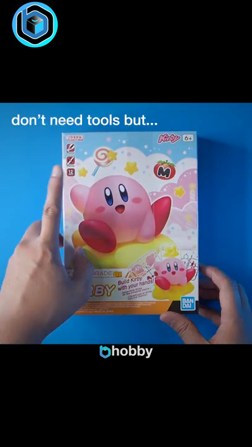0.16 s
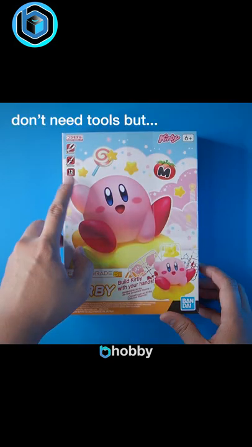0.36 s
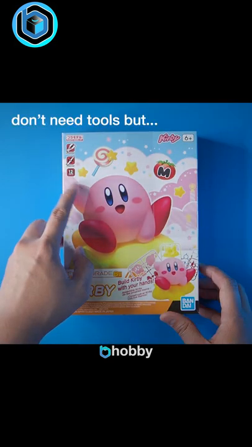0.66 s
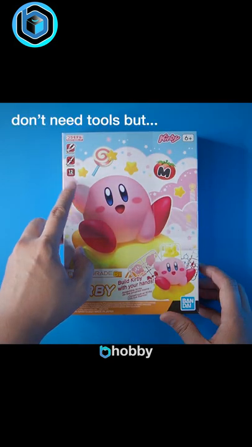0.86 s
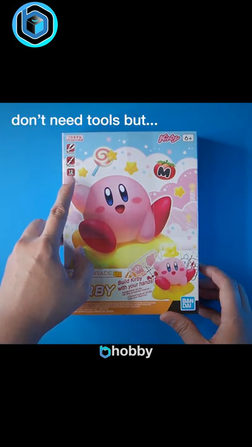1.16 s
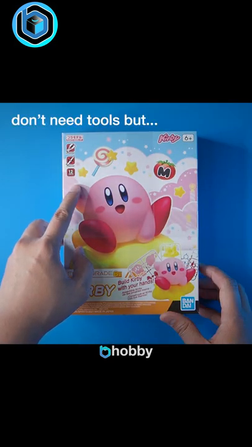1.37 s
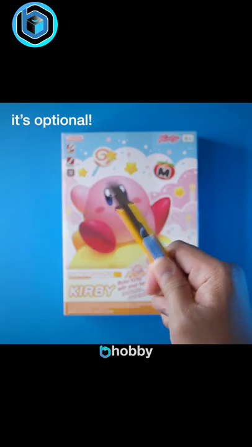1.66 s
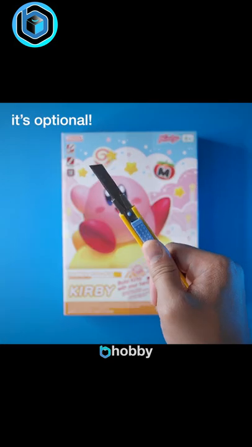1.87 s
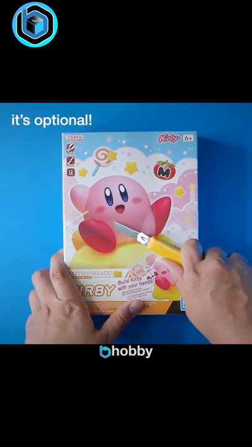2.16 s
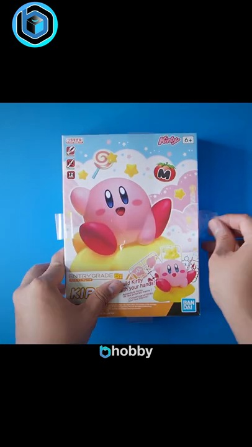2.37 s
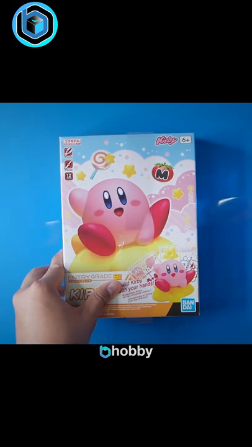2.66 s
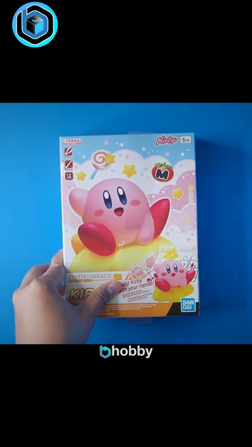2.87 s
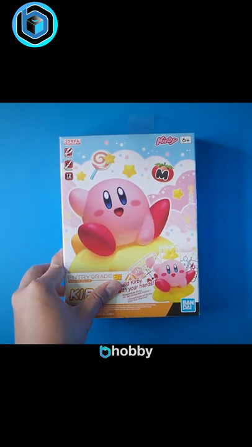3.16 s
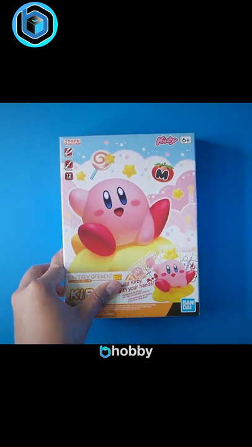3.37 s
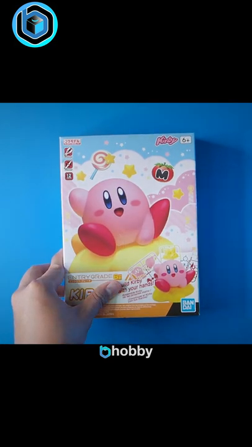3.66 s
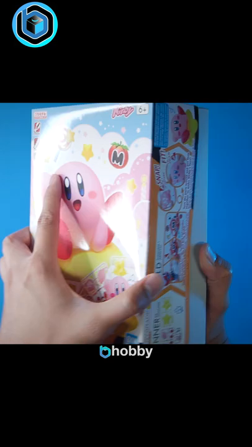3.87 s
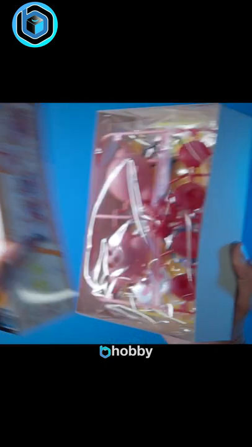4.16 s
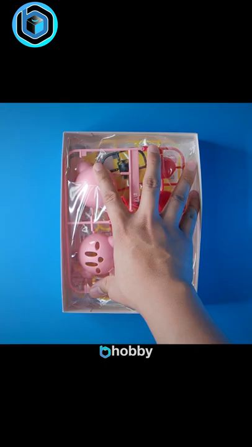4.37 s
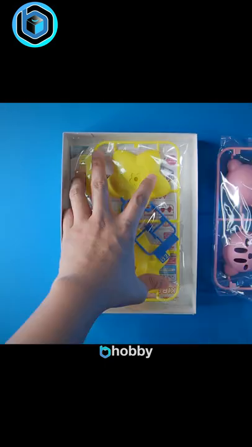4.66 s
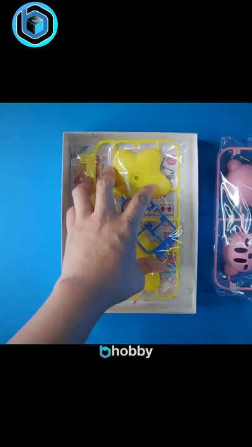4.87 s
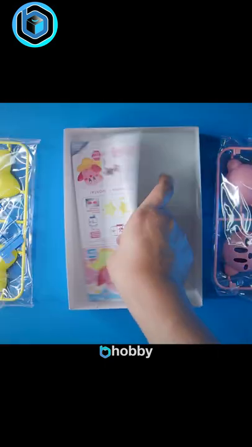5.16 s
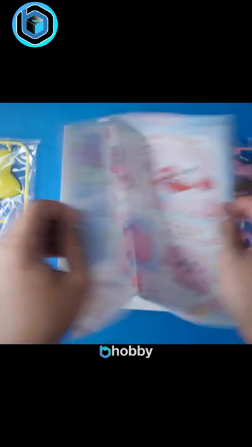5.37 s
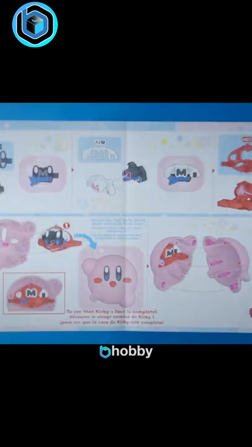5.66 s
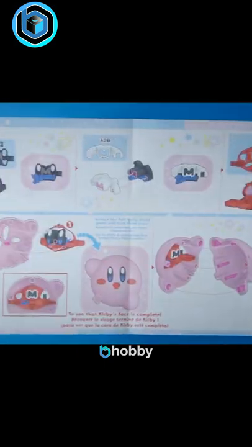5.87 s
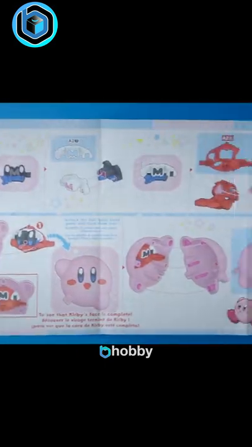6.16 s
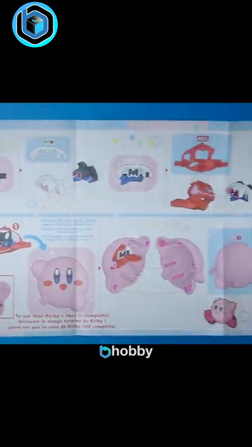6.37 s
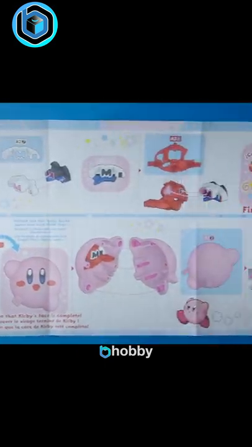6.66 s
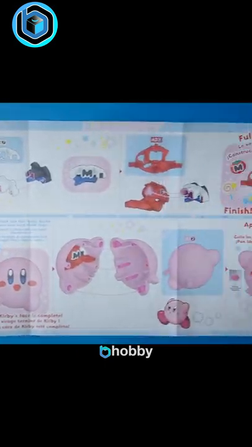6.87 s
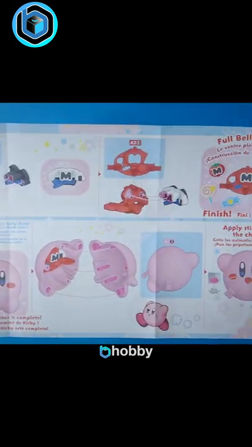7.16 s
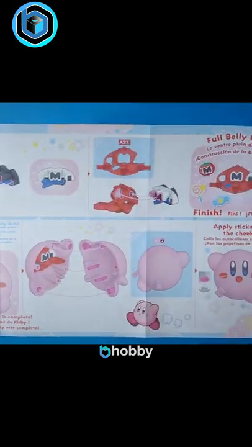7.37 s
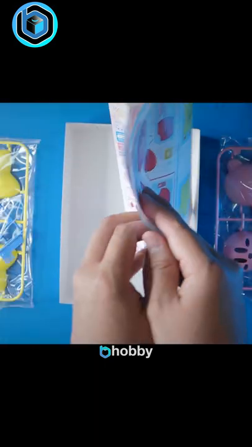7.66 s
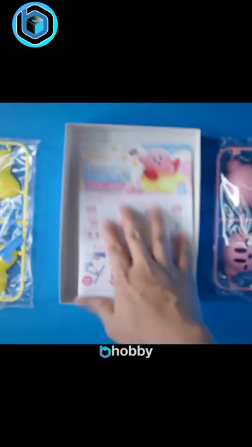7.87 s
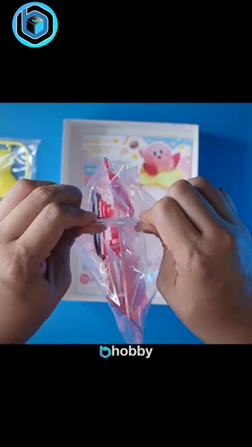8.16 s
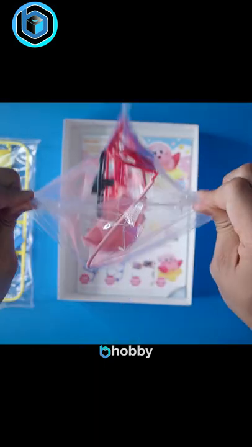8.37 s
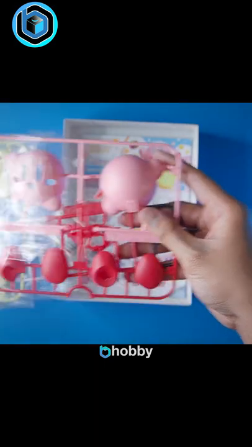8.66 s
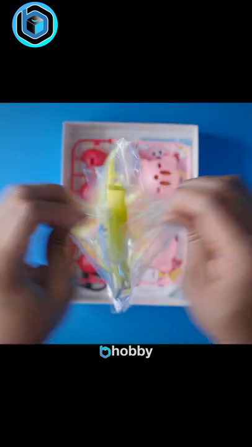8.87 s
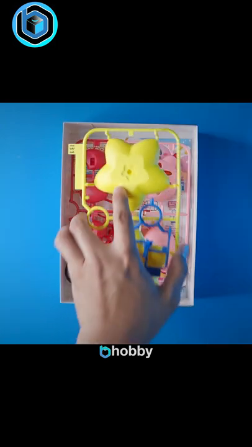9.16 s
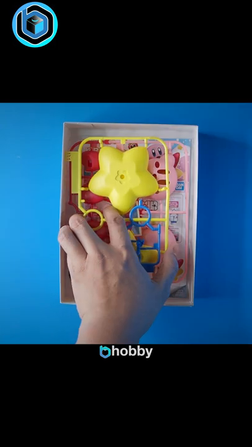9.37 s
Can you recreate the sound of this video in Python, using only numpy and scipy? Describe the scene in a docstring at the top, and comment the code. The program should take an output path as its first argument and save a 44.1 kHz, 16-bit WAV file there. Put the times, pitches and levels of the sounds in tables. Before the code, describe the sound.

Very close in a small dry room, a fingernail taps a hollow cardboard box five times. A craft knife slider clicks rapidly, then wrap and lid scrape over cardboard with a gliding swish. Plastic bags crinkle sharply, a paper leaflet rustles open, creeps almost silently, and is folded. Bags crinkle again; a plastic parts frame clacks into the box and rattles briefly.

```python
"""A model kit is unboxed on a desk in a small room, close to the microphone.
A fingernail taps the box (click, panel knock, cavity boom); a craft knife ratchets (clicks, ringing blade);
fingertip, knife, wrap and lid rub on cardboard (gritty friction, a gliding swish, catches);
plastic bags crinkle (resonant snaps); a leaflet is unfolded, creeps over the desk and is folded
(rustle, buckles, ticks); the bags crinkle again; a runner of parts drops into the box
(clacks, ringing, rattle). Faint noise and mains hum lie beneath."""
import sys
import numpy as np
from scipy import signal
from scipy.fft import rfft, irfft, next_fast_len
from scipy.io import wavfile
from scipy.ndimage import uniform_filter1d

SR = 44100
rng = np.random.default_rng(int(sys.argv[2]) if len(sys.argv) > 2 else 0)


def dump_mix(stems):
    """Bounce the given channels to the path in sys.argv[1] as a 16-bit WAV at rate SR."""
    frames = np.atleast_2d(stems).T  # one column per channel
    limited = np.clip(frames, -1, 1)  # hard clip at full scale
    pcm = np.round(limited * 32767).astype(np.int16)
    wavfile.write(sys.argv[1], SR, pcm)


N = 419391
TIME = np.arange(N) / SR

# low modes of the air in the box: [pitch_hz, level_db, t60_s]
CAVITY_MODES = [(129.9, 5.5, .1), (164.4, -2, .11), (201.6, -3, .1)]


def box():
    """Nail click, knock of the lid panel and boom of the cavity; soft bumps raise only the boom."""
    # fingernail on the lid: [start_s, click_db, knock_db, boom_db]
    taps = [(0.0928, -33.5, -58, -73), (0.261, -10.5, -27, -35), (0.309, -55, -46.5, -61),
            (0.6289, -13.5, -30, -31.5), (0.6708, -38, -45, -46.5), (0.8096, -12.5, -30, -33),
            (0.878, -46.5, -50.5, -56), (1.0032, -15, -32, -31), (1.129, -48, -40, -45),
            (1.3494, -13, -29.5, -31)]
    # soft bumps of box and desk: [start_s, level_db, lowest_mode_hz]
    bumps = [(2.625, -40, 208), (2.944, -47.5, 133), (3.244, -41.5, 228), (3.451, -34.5, 198),
             (3.507, -32.5, 156), (3.894, -17, 116), (4.032, -28.5, 120), (4.085, -23.5, 134),
             (5.283, -26.5, 131), (5.556, -32, 137), (5.612, -34, 120), (6.594, -42.5, 138),
             (6.985, -41, 133), (7.117, -46.5, 147), (7.934, -40, 144), (8.578, -31, 101),
             (8.945, -30, 133), (9.255, -40, 135)]
    # modes of the lid: [pitch_hz, level_db, t60_s]
    lid_modes = [(261, -2, .06), (388.4, -1.5, .068), (478, 1, 0.1), (604, -0.5, .035), (710, 3.5, 0.084),
                 (883, 3, 0.038), (976, 0, 0.082), (1342, -3.5, 0.068)]
    # colour of the nail click: [freq_hz, level_db]
    nail_colour = [(500, -19), (1200, -2), (2200, -6.5), (3000, -3), (4200, 0), (5200, -11), (8000, -14),
                   (11000, -26), (16000, -28)]
    # colour of the lid's many crowded, damped modes: [freq_hz, level_db]
    panel_colour = [(150, -20), (300, -1.5), (520, -3.5), (900, -4.5), (1500, -18), (3000, -22.5),
                    (8000, -63.5)]

    nail_hits = plain([(s, click_db) for s, click_db, _, _ in taps])
    panel_hits = plain([(s, knock_db) for s, _, knock_db, _ in taps])
    out = cracks(nail_hits, nail_colour, dying_s=0.0031, after_db=-14, tilt_db=0)
    out += from_db(1) * cracks(panel_hits, panel_colour, dying_s=0.014, after_db=0, tilt_db=0)
    for s, _, knock_db, boom_db in taps:
        spot_tuning = rng.uniform(.92, 1.08)  # each spot of the lid has its own pitch
        add(out, s, from_db(knock_db - 5) * ring(lid_modes, vary_db=1.5, tuning=spot_tuning))
        add(out, s, from_db(boom_db + 13.5) * boom(swell_s=0.017))
    for s, db, hz in bumps:
        add(out, s, from_db(db - 6) * boom(swell_s=0.0034, tuning=hz / CAVITY_MODES[0][0]))
    return out


def boom(swell_s, tuning=1):
    """The air in the box takes time to start swinging."""
    sound = ring(CAVITY_MODES, vary_db=2.5, tuning=tuning)
    return sound * (1 - np.exp(-(TIME[:len(sound)] / swell_s) ** 2))


def cardboard():
    """Gritty friction that surges as the sheet sticks and slips, with a swish and a few catches."""
    # rubbing strokes of fingertip, knife, wrap and lid:
    # [start_s, length_s, friction_db, swell_db, treble_db, drone_db]
    rubs = [(0.89, 0.074, -62.5, -9, -15, 3.5), (2.018, 0.099, -65.5, 11, 6, 2),
            (2.087, 0.037, -44, 0.5, -12, 0.5), (2.131, 0.093, -40, 17.5, -6.5, -6.5),
            (2.419, 0.053, -52.5, 13.5, 3.5, -1), (2.476, 0.38, -41, 1.5, -7.5, -19),
            (3.034, 0.27, -40.5, 12, -4.5, -15), (3.333, 0.09, -37, 8, -8, -21),
            (3.421, 0.098, -35, -5, -8, -10), (3.556, 0.051, -38, -6, -7.5, -32),
            (3.651, 0.0073, -55, -3, 10.5, -35), (3.744, 0.074, -44, 11, -10.5, -8),
            (3.797, 0.27, -32.5, 0, -16, -11.5), (4.019, 0.068, -26, 2, -26, -11),
            (4.12, 0.099, -47.5, 0.5, -11, -26), (4.214, 0.016, -36.5, -0.5, -15, -34),
            (4.276, 0.0092, -51, 9.5, -27.5, -14)]
    # cardboard catching and letting go: [start_s, level_db, centre_hz]
    catches = [(2.229, -12.5, 905), (2.244, -14, 653), (2.626, -14.5, 710), (2.748, -23.5, 2640),
               (2.812, -23.5, 3000), (2.853, -24, 2400), (2.9785, -34.5, 5600), (3.251, -17.5, 870),
               (3.26, -17, 4040), (3.509, -17.5, 2470), (3.571, -13.5, 4560), (3.814, -15, 440),
               (4.083, -14, 1110), (4.098, -6.5, 1110), (4.141, -19, 1770), (4.183, -26, 1390)]
    # colour of cardboard: [freq_hz, level_db]
    card_colour = [(47, -33.5), (80, -30), (125, -1.5), (309, -10.5), (395, -4.5), (672, -9), (1120, -3),
                   (1430, -5.5), (2800, -7), (3960, -4.5), (5400, -20), (13000, -46.5), (16000, -42.5)]

    grain = friction(card_colour, slips_per_s=5000, size_db=3, smooth_db=-2,
                     clump_db=2.5, clumps_per_s=70, sharpness=4)
    grain = patchy(grain, depth_db=2.3, changes_per_s=30, count=12)
    rubbing = toned(grain, rubs, attack_s=0.0086, release_s=0.021, top_db=1, low_db=0.5, hollow_db=-14.5)
    singing = swish(width_hz=1400)
    catching = cracks(catches, card_colour, dying_s=0.0041, after_db=-0.5, tilt_db=2.5, facet_db=5.5)
    return from_db(-2) * rubbing + singing + from_db(-5) * catching


def swish(width_hz):
    """The wrap sings as it is dragged off the box: narrow friction noise on a gliding pitch."""
    # drags of the wrap: [start_s, length_s, level_db, swell_db, from_hz, to_hz]
    drags = [(2.64, .22, -43, 0, 3400, 3100), (3.05, .28, -38.5, 9, 3400, 4200)]
    points = []
    for s, length_s, _, _, from_hz, to_hz in drags:
        points += [(s, from_hz), (s + length_s, to_hz)]
    phase = 2 * np.pi * np.cumsum(np.interp(TIME, *np.transpose(points))) / SR
    narrow_noise = drift(width_hz) * np.cos(phase) + drift(width_hz) * np.sin(phase)
    return effort(drags, attack_s=0.0028, release_s=0.006) * narrow_noise


def leaflet():
    """Paper rustles and buckles as it is folded, and whispers and ticks as it creeps over the desk."""
    # strokes of pulling out, opening, folding: [start_s, length_s, rustle_db, swell_db, treble_db, flap_db]
    folds = [(5.088, 0.032, -36, 11.5, 3.5, -24.5), (5.145, 0.077, -28.5, -6.5, -7, -13.5),
             (5.244, 0.035, -27.5, -32, -6.5, -16), (5.268, 0.032, -33.5, -11, -28, -6.5),
             (5.35, 0.079, -32.5, 10, -8.5, -15), (5.423, 0.098, -32.5, 4, -36, -13),
             (5.549, 0.059, -28.5, 7.5, -37.5, -25), (5.604, 0.072, -24.5, 2.5, -64, -18),
             (5.697, 0.029, -36, -13, -28, -20), (6.329, 0.055, -60, 8, 2, -2),
             (7.441, 0.017, -54.5, -2, -24, 2), (7.463, 0.017, -37.5, -12, -35.5, -1.5),
             (7.497, 0.009, -27.5, 0, -31, -27), (7.567, 0.12, -30.5, -14.5, -26.5, -22),
             (7.668, 0.087, -49, 11, -3, -24), (7.882, 0.051, -39.5, 23, 0, -5.5)]
    # paper buckling: [start_s, level_db, centre_hz]
    buckles = [(5.192, -8.5, 2880), (5.168, -19.5, 2260), (5.391, -23, 2710), (5.418, -13.5, 1820),
               (5.451, -13, 3800), (5.483, -13, 2800), (5.56, -17, 2070), (5.569, -11.5, 2320),
               (5.622, -13.5, 3820), (5.651, -11, 3470), (5.665, -14, 3480), (6.373, -34, 3950),
               (6.596, -44.5, 3600), (6.645, -40.5, 1050), (6.69, -36, 2320), (6.773, -42.5, 980),
               (6.83, -27, 1880), (6.988, -25, 1660), (7.043, -35.5, 1510), (7.118, -35.5, 1590),
               (7.503, -19, 1200), (7.579, -7.5, 4170), (7.639, -13.5, 3340), (7.857, -34.5, 3960),
               (7.911, -13.5, 2380), (7.933, -14, 970)]
    # open leaflet creeping over the desk: [start_s, length_s, level_db, swell_db]
    creeps = [(5.76, 1.39, -68.5, 1)]
    # edge ticking on the desk: [start_s, level_db]
    ticks = [(5.917, -48), (5.958, -44), (6.435, -47), (6.524, -53), (6.552, -51), (6.928, -45),
             (7.272, -53.5)]
    # colour of paper: [freq_hz, level_db]
    paper_colour = [(47, -25.5), (80, -6.5), (142, -1), (323, -14), (450, -9), (570, -14.5), (850, -3),
                    (1490, -2), (3620, -1), (5400, -12.5), (9500, -31.5), (13100, -42.5), (16000, -47.5)]
    # colour of the creeping whisper: [freq_hz, level_db]
    whisper_colour = [(70, -18), (150, -3.5), (300, -22), (450, -21.5), (700, -12), (1000, -23),
                      (2700, -23), (3600, -12), (5000, -28), (16000, -43)]

    grain = friction(paper_colour, slips_per_s=4000, size_db=3.3, smooth_db=-5,
                     clump_db=3, clumps_per_s=160, sharpness=5)
    grain = patchy(grain, depth_db=2, changes_per_s=70)
    folding = toned(grain, folds, attack_s=0.0069, release_s=0.017, top_db=-9, low_db=1.2, hollow_db=-17)
    whisper = friction(whisper_colour, slips_per_s=250, size_db=3, smooth_db=0, clump_db=4, clumps_per_s=35)
    creeping = effort(creeps, attack_s=0.083, release_s=0.065) * whisper
    buckling = cracks(buckles, paper_colour, dying_s=0.0076, after_db=-3, tilt_db=3.5, facet_db=5)
    buckling = band(buckling, low_hz=40, high_hz=10000, order=2)
    ticking = cracks(plain(ticks), paper_colour, dying_s=0.0028, after_db=-2, tilt_db=0)
    return from_db(-3.5) * (folding + buckling) + creeping + from_db(-6) * ticking


def bags():
    """Stiff film crinkles in sparse, sharp snaps, each crease ringing at its own pitch."""
    # squeezing and pulling open: [start_s, length_s, crinkle_db, swell_db, treble_db, flap_db]
    squeezes = [(4.438, 0.11, -35, 0.5, -19, -1), (4.564, 0.19, -55, 20, -21, -1.5),
                (4.813, 0.043, -39, 7, -22, -9.5), (8.245, 0.063, -32, -3.5, -18, -11),
                (8.337, 0.2, -55, 8, -18, -36), (8.544, 0.085, -35, -10, -23, -16.5),
                (8.659, 0.028, -31, -0.5, -15.5, -15), (8.879, 0.067, -25, 1.5, -19.5, -14.5)]
    # creases snapping over: [start_s, level_db, crease_hz]
    snaps = [(4.3723, -27.5, 3900), (4.4154, -22.5, 3440), (4.4418, -30, 1070), (4.4614, -13, 3680),
             (4.4853, -17, 3420), (4.498, -14, 2930), (4.534, -14.5, 3530), (4.5466, -10.5, 3400),
             (4.5546, -16.5, 3340), (4.5715, -20, 1380), (4.6056, -20.5, 3360), (4.6545, -24, 3020),
             (4.7871, -21, 3630), (4.8071, -15, 6400), (4.8218, -17, 3700), (4.8281, -15.5, 3300),
             (4.8404, -19, 3790), (4.8587, -18.5, 3940), (4.8871, -13, 3430), (4.8995, -30, 3530),
             (4.9217, -25.5, 3900), (4.9596, -27.5, 2800), (4.9881, -22.5, 3880), (8.0807, -27.5, 3420),
             (8.1133, -14.5, 1840), (8.1921, -25.5, 4270), (8.2145, -12.5, 4250), (8.2519, -14, 4070),
             (8.2615, -12, 4300), (8.2927, -15, 4100), (8.4164, -33, 6000), (8.431, -25.5, 4010),
             (8.4392, -24.5, 6160), (8.4749, -16.5, 4660), (8.4971, -29, 2240), (8.5385, -22, 5530),
             (8.5849, -14.5, 4200), (8.6174, -24, 6000), (8.6743, -23, 3170), (8.7838, -14.5, 1590),
             (8.7998, -18.5, 3600), (8.869, -15.5, 3190), (8.8922, -18, 2880), (8.9236, -11.5, 1190),
             (8.9713, -15.5, 3880), (9.0166, -23, 3900), (9.0594, -30, 8200)]
    # colour of film: [freq_hz, level_db]
    film_colour = [(59, -58), (100, -18.5), (163, -26), (255, -22), (373, -14.5), (502, -21), (768, -6.5),
                   (1680, -3), (3940, 1), (5200, -7.5), (10000, -22), (14400, -28.5), (16000, -28)]

    crinkle = friction(film_colour, slips_per_s=1700, size_db=3.7, smooth_db=-12,
                       clump_db=4, clumps_per_s=160, sharpness=5)
    squeezing = toned(crinkle, squeezes, attack_s=0.0017, release_s=0.03, top_db=-4, low_db=-4.5, hollow_db=-21)
    snapping = cracks(snaps, film_colour, dying_s=.0015, after_db=-7, tilt_db=1.5, facet_db=5.5)
    return from_db(-1.34) * squeezing + from_db(-1) * snapping


def knife():
    """The slider jumps from notch to notch, the blade's tip catches and the steel rings briefly."""
    # notches and catches of the tip: [start_s, level_db]
    ratchet = [(1.616, -44), (1.6455, -29), (1.6816, -12.5), (1.6871, -11.5), (1.721, -18.5),
               (1.7265, -16.5), (1.7425, -19), (1.758, -19.5), (1.7798, -17), (1.817, -17.5),
               (1.8534, -13.5), (1.928, -30.5), (2.0973, -19), (2.1097, -20)]
    # modes of the blade: [pitch_hz, level_db, t60_s]
    blade_modes = [(2200, -6, .06), (4150, -3, .04), (6300, 0, .07)]
    # colour of the clicks: [freq_hz, level_db]
    click_colour = [(700, -30.5), (1250, -18), (2220, -12), (2530, -17.5), (3110, -7.5), (3750, -7),
                    (4100, 4.5), (4920, -12.5), (6230, -7.5), (7990, -9.5), (9600, -25.5), (14200, -19),
                    (16000, -37)]

    clicks = cracks(plain(ratchet), click_colour, dying_s=.003, after_db=0, tilt_db=0)
    blade = struck(ratchet, blade_modes, vary_db=3)
    return from_db(-8.5) * clicks + from_db(-26) * blade


def runner():
    """The plastic frame clacks down, rings and rattles to rest against the parts beneath."""
    # landing and settling: [start_s, level_db, centre_hz]
    landing = [(9.2535, -11, 3670), (9.2557, -24, 3700), (9.265, -26, 3700), (9.277, -20, 2920),
               (9.2905, -23.5, 4450), (9.344, -29, 2160), (9.386, -41, 3660)]
    # shivering against the parts beneath: [start_s, length_s, level_db, swell_db]
    shivers = [(9.256, 0.15, -48.5, -11.5)]
    # modes of the frame: [pitch_hz, level_db, t60_s]
    frame_modes = [(1100, -2, .06), (2020, -1, .11), (2280, -2, .11), (2830, -2, .08), (3510, 3, .1),
                   (3740, 5, .1), (4450, 1, .1)]
    # colour of the plastic: [freq_hz, level_db]
    plastic_colour = [(150, -27), (431, -15), (1120, -7), (1720, -6), (2020, -1.5), (3290, -9.5),
                      (3550, -0.5), (9500, -25.5), (12000, -30), (16000, -41)]

    clacks = cracks(landing, plastic_colour, dying_s=.003, after_db=-5, tilt_db=1, facet_db=6)
    frame = struck(landing, frame_modes, vary_db=2)
    rattle = friction(plastic_colour, slips_per_s=1500, size_db=3, smooth_db=-13, clump_db=3, clumps_per_s=60)
    ringing = rms_one(signal.oaconvolve(rng.standard_normal(N), ring(frame_modes, vary_db=1))[:N])
    shiver = effort(shivers, attack_s=.003, release_s=0.014) * (rattle + ringing) / np.sqrt(2)
    return from_db(3.5) * clacks + from_db(-27) * frame + shiver


def room(x, wet_db, gap_s, size=16000):
    """Dense reflections from desk and walls build up after a short gap; each band dies at its own rate."""
    # reverberation: [freq_hz, t60_s]
    decay_times = [(300, 0.16), (1400, 0.2), (3700, 0.18), (10000, 0.17)]
    t, edges_hz = TIME[:size], np.geomspace(220, 18000, 8)
    tail = np.zeros(size)
    for low_hz, high_hz in zip(edges_hz, edges_hz[1:]):
        t60_s = at_hz(decay_times, np.sqrt(low_hz * high_hz))
        tail += band(rng.standard_normal(size), low_hz, high_hz) * from_db(-60 * t / t60_s)
    tail *= 1 - np.exp(-(t / gap_s) ** 2)
    return x + from_db(wet_db) * signal.oaconvolve(x, tail / np.linalg.norm(tail))[:N]


def background():
    """Faint coloured room noise and a sine of mains hum."""
    # colour of the room noise: [freq_hz, level_db]
    noise_colour = [(25, -17.5), (60, -9), (90, -15.5), (160, 3), (280, -25), (450, -17.5), (1000, -17),
                    (4000, -18.5), (16000, -32.5)]
    noise_rms_db, hum_hz, hum_peak_db = -72.5, 60, -76
    noise = from_db(noise_rms_db) * coloured(rng.standard_normal(N), noise_colour)
    return noise + from_db(hum_peak_db) * np.sin(2 * np.pi * hum_hz * TIME)


def brief_dip():
    """Gain: the level dips briefly, with short ramps."""
    # dip: [from_s, to_s, level_db]
    from_s, to_s, dip_db = (4.70, 4.779, -32)
    inside = (TIME > from_s) & (TIME < to_s)
    return from_db(uniform_filter1d(np.where(inside, dip_db, 0.0), size=400))


def cracks(events, spectrum, dying_s, after_db, tilt_db, facet_db=0, grain_db=3, size=4000):
    """Each crack is one sharp release and a dying cluster of smaller ones, in a colour of its own."""
    out, t = np.zeros(N), TIME[:size]
    usual_hz = np.median(np.array(events)[:, 2])
    fade = np.exp(-t / dying_s)
    for s, db, hz in events:
        own_colour = [(f, level + rng.normal(0, 2)) for f, level in spectrum]
        click = response(own_colour, tilt_db * np.log2(hz / usual_hz), hz, facet_db)
        cluster = rng.standard_normal(size) * from_db(grain_db * rng.standard_normal(size)) * fade
        cluster *= np.linalg.norm(fade) / np.linalg.norm(cluster)
        force = from_db(after_db) * cluster / np.linalg.norm(click)
        force[0] = 1  # the sharp release
        add(out, s, from_db(db) * signal.fftconvolve(force, click))
    return out


def plain(events):
    """Events for cracks without a pitch: a dummy 1 Hz, unused at zero tilt and facet."""
    return [(s, db, 1) for s, db in events]


def struck(events, modes, vary_db):
    """The same body rings under every blow."""
    out = np.zeros(N)
    for s, db, *_ in events:
        add(out, s, from_db(db) * ring(modes, vary_db))
    return out


def ring(modes, vary_db, tuning=1, size=16000):
    """Dying sines of alternating sign; every blow excites each mode a little differently."""
    t, out = TIME[:size], np.zeros(size)
    for k, (hz, db, t60_s) in enumerate(modes):
        level = from_db(db + vary_db * rng.standard_normal() - 60 * t / t60_s)
        out += (-1) ** k * level * np.sin(2 * np.pi * hz * tuning * t)
    return out


def friction(spectrum, slips_per_s, size_db, smooth_db, clump_db, clumps_per_s, sharpness=2):
    """Clumped tiny ringing slips of uneven size over smooth rubbing; rms 1."""
    sizes = from_db(size_db * np.minimum(rng.exponential(1, N), 3)) * rng.choice([-1, 1], N)
    slips = facets(sizes * (rng.random(N) < slips_per_s / SR), sharpness)
    rubbing = from_db(smooth_db) * rng.standard_normal(N)
    clumps = from_db(clump_db * np.tanh(drift(clumps_per_s)))
    return coloured((slips + rubbing) * clumps, spectrum)


def facets(slips, sharpness, count=14):
    """Each slip rings a patch of the sheet at one of several pitches, for a few cycles; rms 1."""
    dealt, out = rng.integers(0, count, N), np.zeros(N)
    for k, hz in enumerate(np.geomspace(550, 13000, count)):
        b, a = signal.iirpeak(hz, sharpness, fs=SR)
        out += signal.lfilter(b, a, slips * (dealt == k) + 1e-18)  # offset avoids denormals
    return rms_one(out)


def patchy(sound, depth_db, changes_per_s, count=7):
    """Each new crease or spot of contact favours other pitches: the bands waver on their own; rms 1."""
    size = next_fast_len(N, real=True)
    spectrum, hz = rfft(sound, size), np.fft.rfftfreq(size, 1 / SR)
    place = np.interp(np.log(hz + 1), np.log([450, 12000]), [0, count - 1])
    out = np.zeros(N)
    for k in range(count):
        part = irfft(spectrum * np.maximum(0, 1 - np.abs(place - k)), size)[:N]  # triangular band
        out += part * from_db(depth_db * drift(changes_per_s))
    return rms_one(out)


def effort(strokes, attack_s, release_s, extra_db=0):
    """Gain of a hand's strokes: each sets in quickly, swells or eases while it lasts, then dies away."""
    power, rows = np.zeros(N), np.array(strokes)
    for (s, length_s, db, swell_db), more_db in zip(rows[:, :4], extra_db + np.zeros(len(rows))):
        t = TIME[:int((length_s + 10 * release_s) * SR)]
        held = from_db(db + more_db + swell_db * (np.minimum(t / length_s, 1) - .5))
        onset = 1 - np.exp(-(t / attack_s) ** 2)
        release = np.exp(-np.maximum(t - length_s, 0) / release_s)
        add(power, s, (held * onset * release) ** 2)
    return np.sqrt(power)


def toned(sound, strokes, attack_s, release_s, top_db, low_db, hollow_db):
    """Each stroke has its own airy hiss and drone of the sheet's free area, over a fixed hollow murmur."""
    *_, tops_db, lows_db = np.transpose(strokes)
    hollow = rms_one(band(sound, 95, 210))
    low = rms_one(band(sound, 280, 700))
    mid = rms_one(band(sound, 700, 5500))
    top = rms_one(band(np.diff(sound, prepend=0), 6300, 17000))
    body = (mid + from_db(hollow_db) * hollow) * effort(strokes, attack_s, release_s)
    hiss = top * effort(strokes, attack_s, release_s, tops_db + top_db)
    drone = low * effort(strokes, attack_s, release_s, lows_db + low_db)
    return body + hiss - drone


def response(spectrum, tilt_db=0, facet_hz=1, facet_db=0, size=2048):
    """Minimum-phase click of peak 1: rounded colour, tilted in dB an octave, plus one resonance."""
    facet_octaves = 0.22  # half-width of the resonance of a crease or spot of contact
    hz = np.linspace(0, SR / 2, size // 2 + 1)
    colour = np.mean([at_hz(spectrum, hz * near) for near in np.linspace(.95, 1.05, 10)], axis=0)
    facet = facet_db / (1 + (np.log2((hz + 1) / facet_hz) / facet_octaves) ** 2)
    tilt = tilt_db * np.log2(np.clip(hz, 500, 8000))
    cepstrum = irfft(np.log(from_db(colour + facet + tilt)))
    cepstrum[1:size // 2] *= 2  # fold the cepstrum to make it causal
    cepstrum[size // 2 + 1:] = 0
    click = irfft(np.exp(rfft(cepstrum)))
    return click / np.abs(click).max()


def coloured(x, spectrum):
    """Give a long excitation a colour; rms 1."""
    return rms_one(signal.oaconvolve(x, response(spectrum))[:N])


def drift(per_s):
    """Random wander: straight lines between unit-normal knots, per_s knots a second."""
    knots = rng.standard_normal(N // 10)
    return np.interp(TIME * per_s, np.arange(len(knots)), knots)


def band(x, low_hz, high_hz, order=3):
    """Butterworth band-pass."""
    edges_hz = [low_hz, min(high_hz, SR / 2 - 100)]
    return signal.sosfilt(signal.butter(order, edges_hz, "band", fs=SR, output="sos"), x)


def at_hz(points, hz):
    """Read a table on a log-frequency axis."""
    table = np.array(points)
    return np.interp(np.log(hz + 1), np.log(table[:, 0]), table[:, 1])


def from_db(db):
    """Decibels to gain."""
    return np.exp(np.asarray(db) * (np.log(10) / 20))


def rms_one(x):
    """Scale to rms 1."""
    return x / np.sqrt(np.mean(x ** 2) + 1e-20)


def add(track, s, sound):
    """Mix a sound in at time s."""
    start = int(s * SR)
    track[start:start + len(sound)] += sound[:N - start]


def scene():
    """Everything happens on the desk, over faint room noise and mains hum; the level dips once."""
    handled = room(knife() + cardboard() + leaflet() + bags() + runner(), wet_db=-11.5, gap_s=0.00064)
    tapped = room(box(), wet_db=-18.5, gap_s=0.0012)
    return ((handled + tapped + background()) * brief_dip())[None]


def record(dry):
    """The highest peaks are rounded by a soft limit and the top is cut by a steep low-pass."""
    limit, cutoff_hz = .48, 16000
    rounded = limit * np.tanh(dry / limit)
    return signal.sosfilt(signal.ellip(10, .1, 80, cutoff_hz, fs=SR, output="sos"), rounded)


dry = scene()
out = record(dry)
dump_mix(out)
```